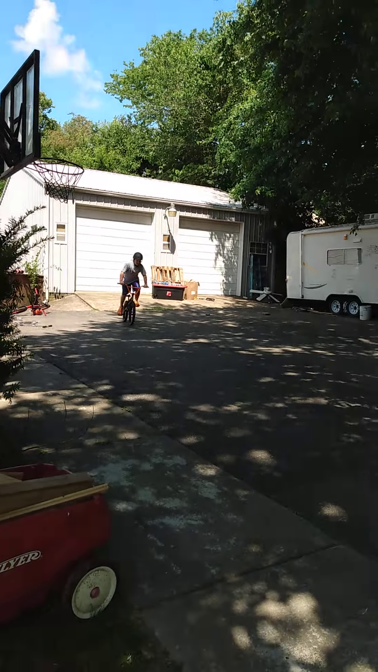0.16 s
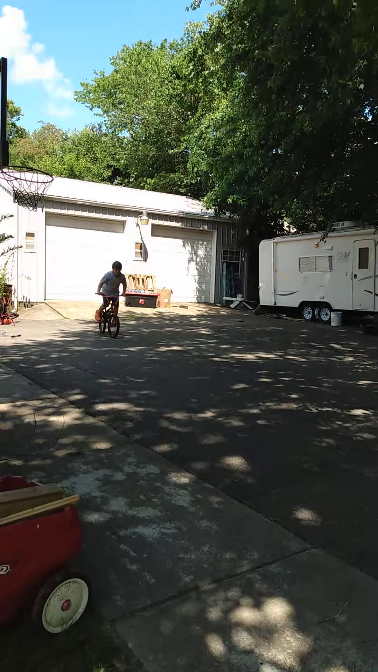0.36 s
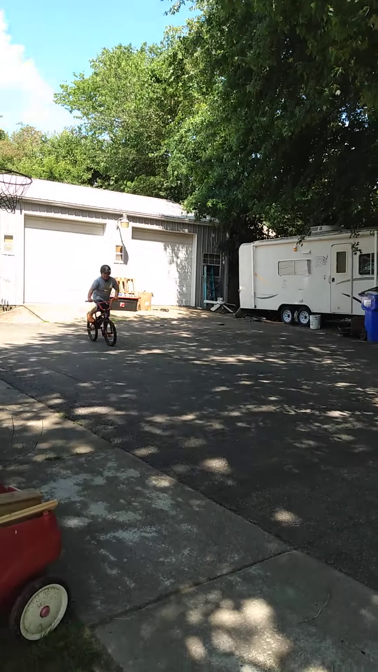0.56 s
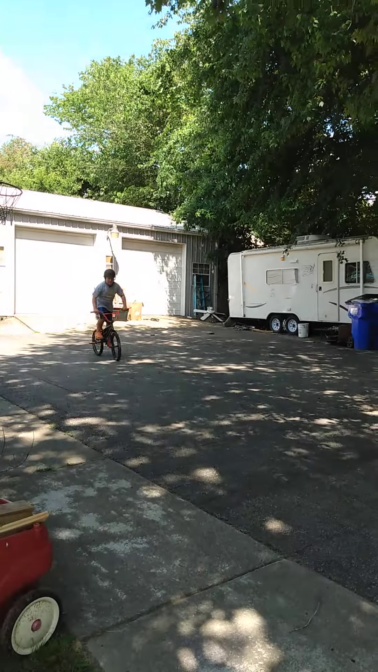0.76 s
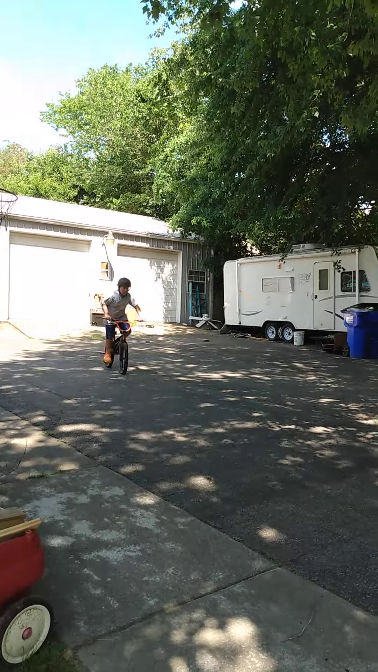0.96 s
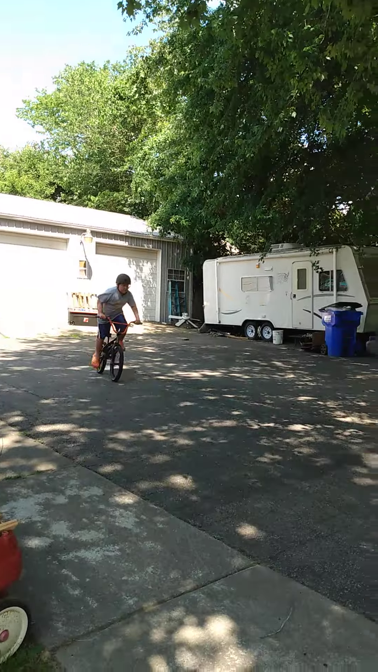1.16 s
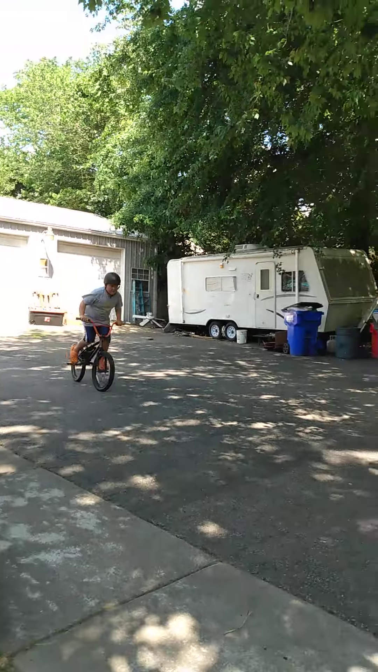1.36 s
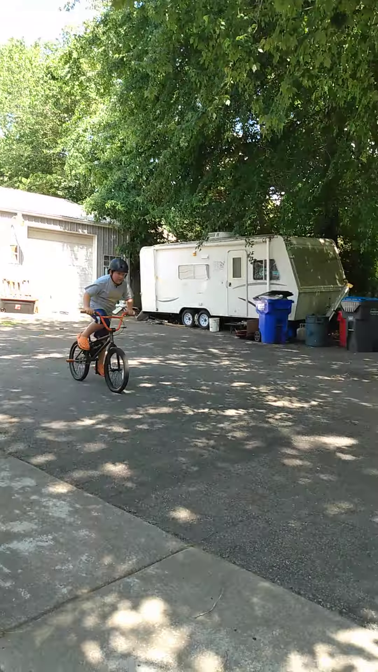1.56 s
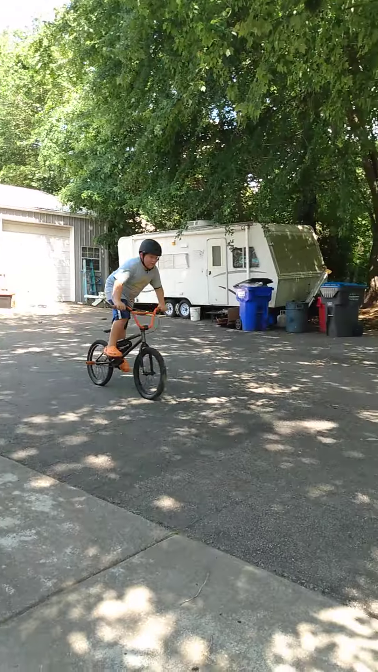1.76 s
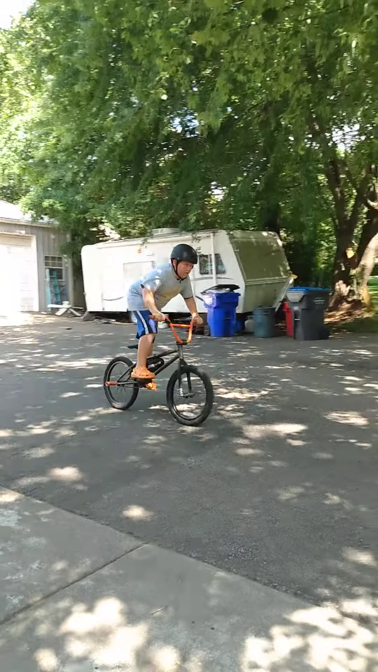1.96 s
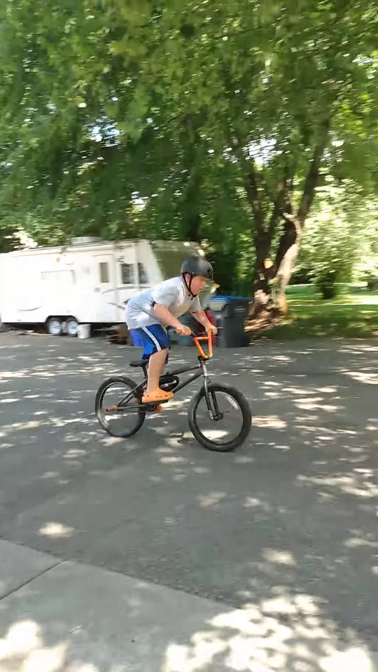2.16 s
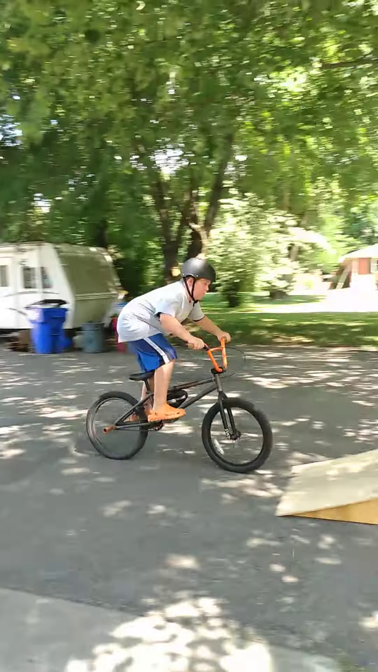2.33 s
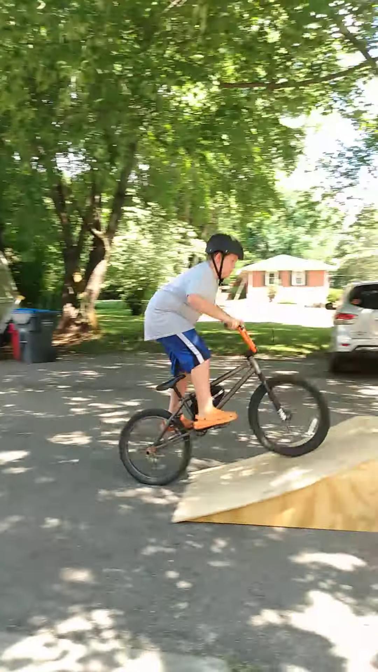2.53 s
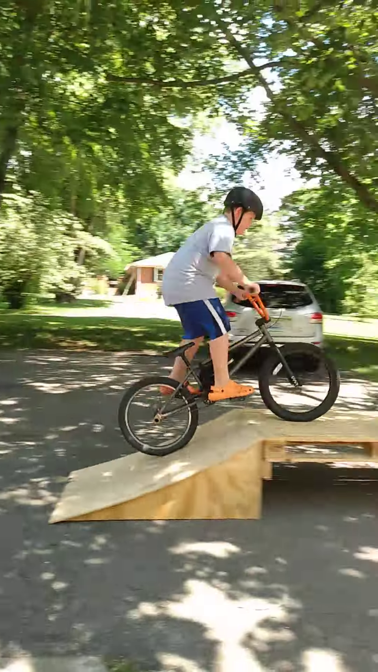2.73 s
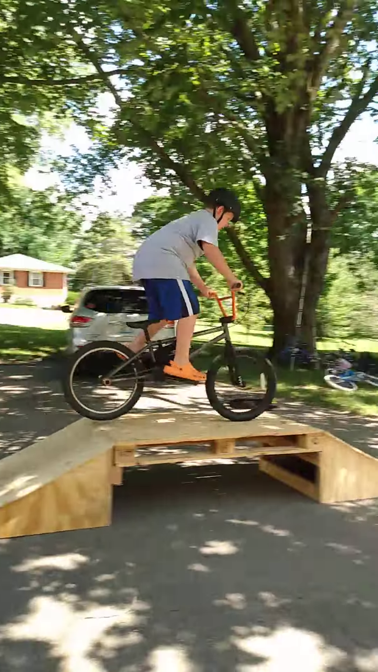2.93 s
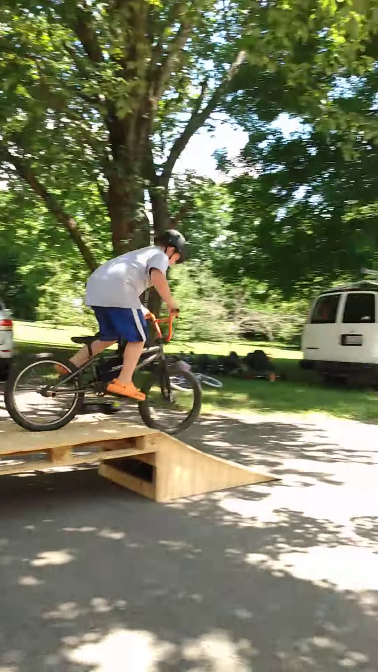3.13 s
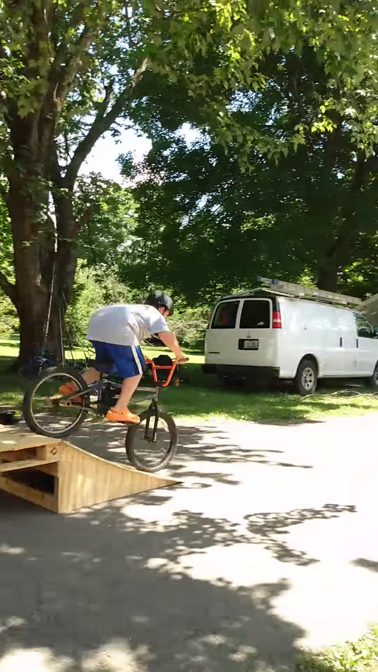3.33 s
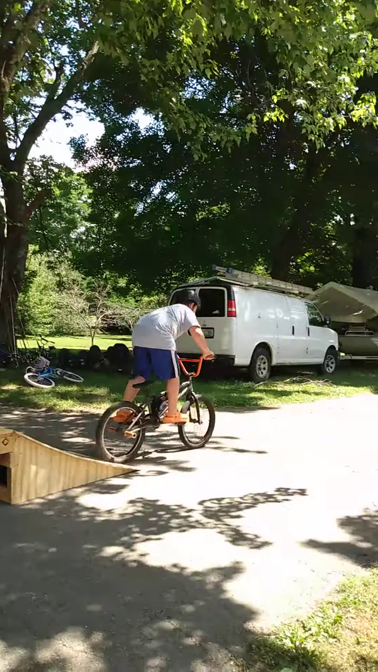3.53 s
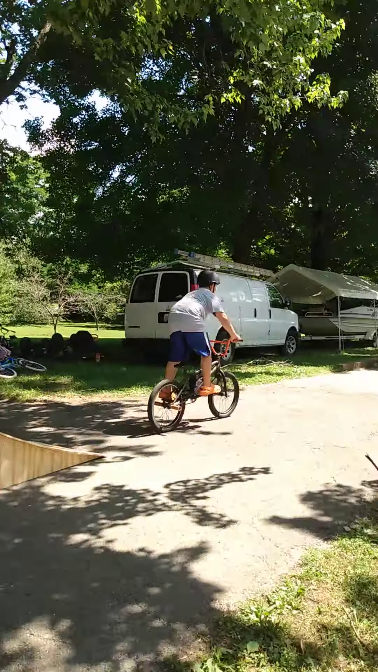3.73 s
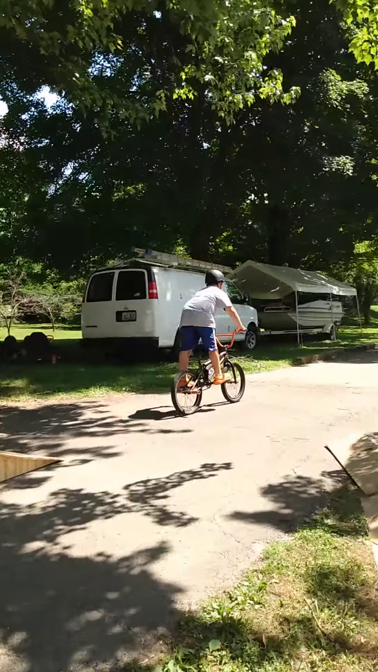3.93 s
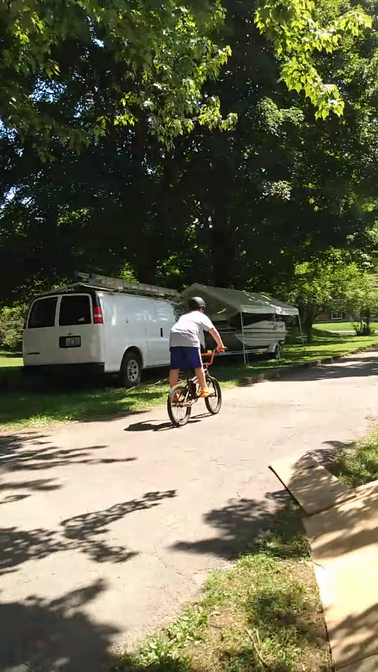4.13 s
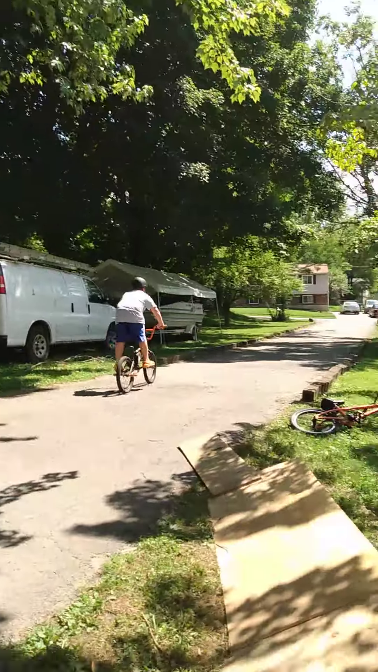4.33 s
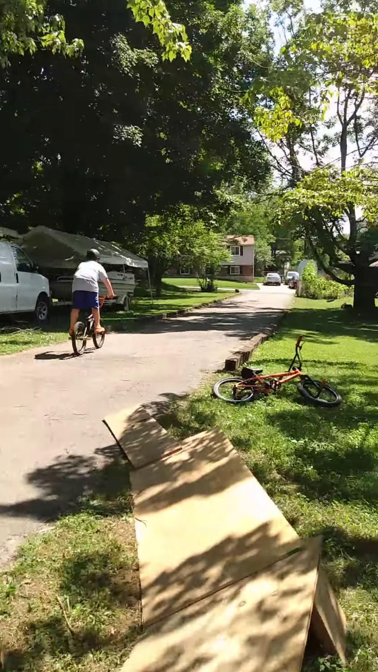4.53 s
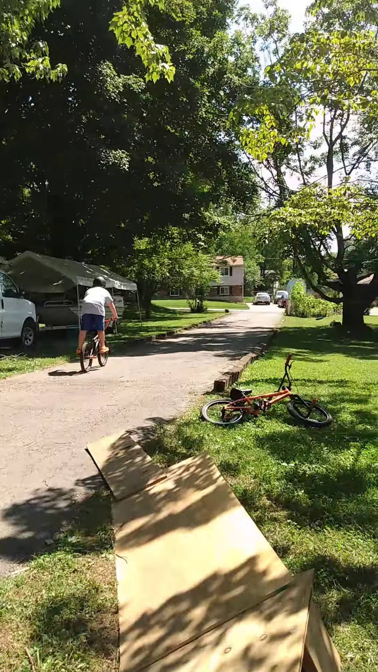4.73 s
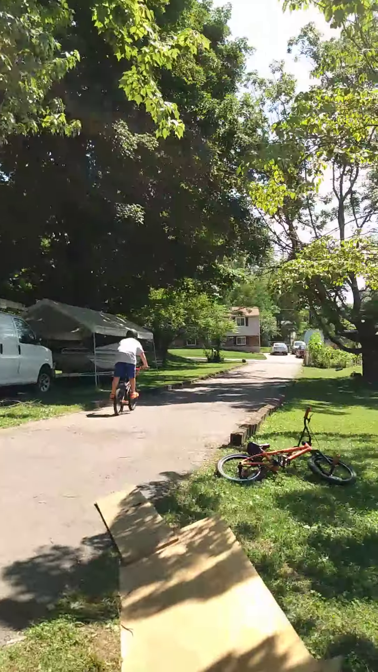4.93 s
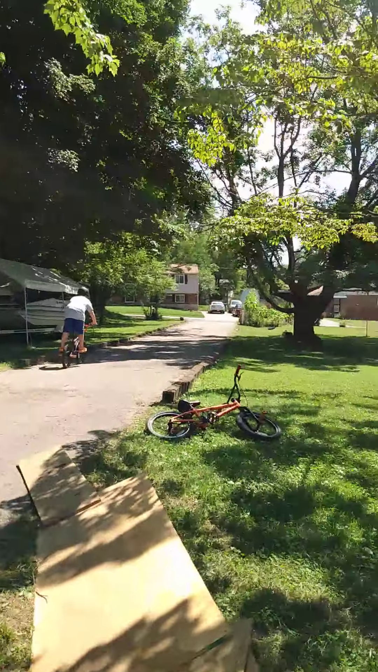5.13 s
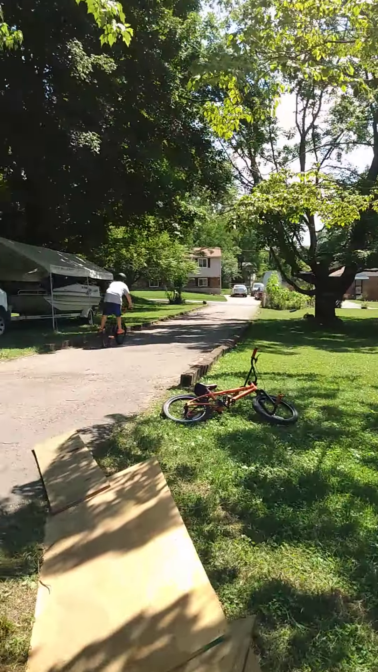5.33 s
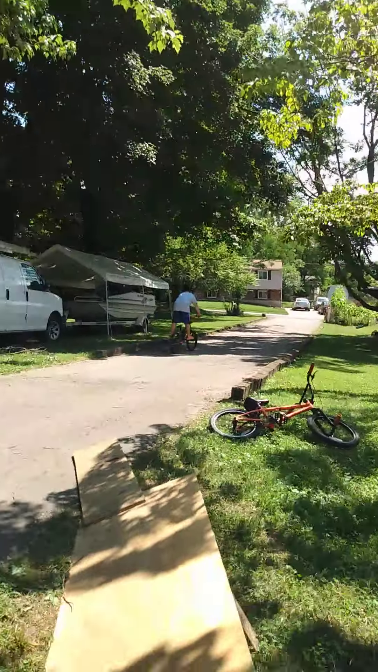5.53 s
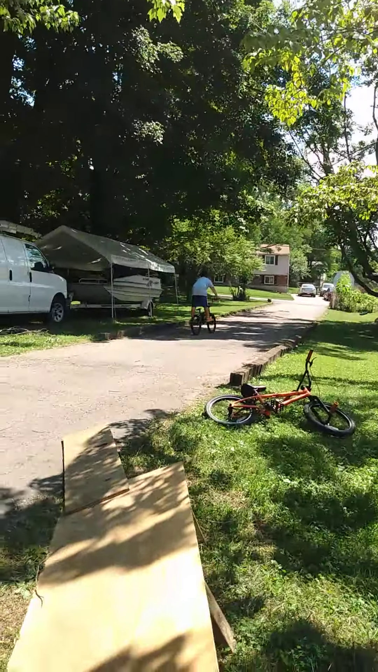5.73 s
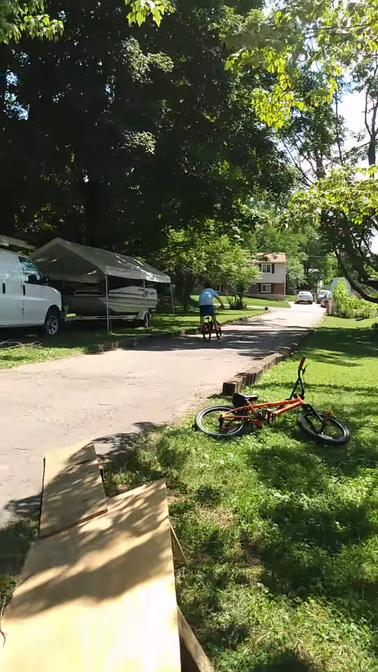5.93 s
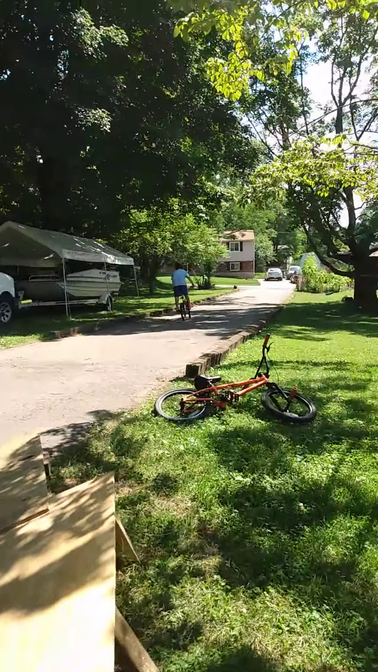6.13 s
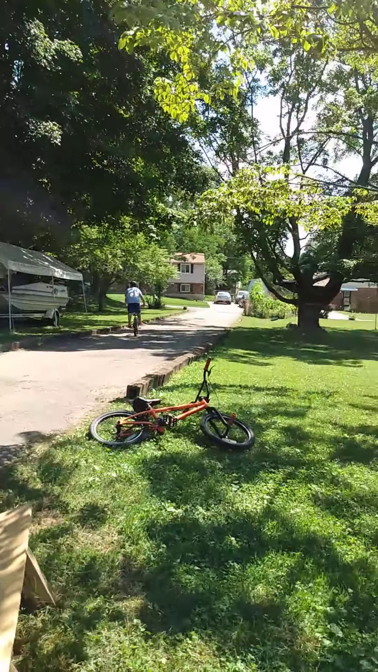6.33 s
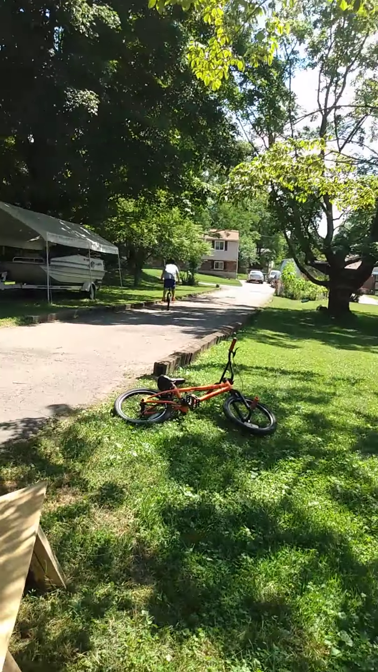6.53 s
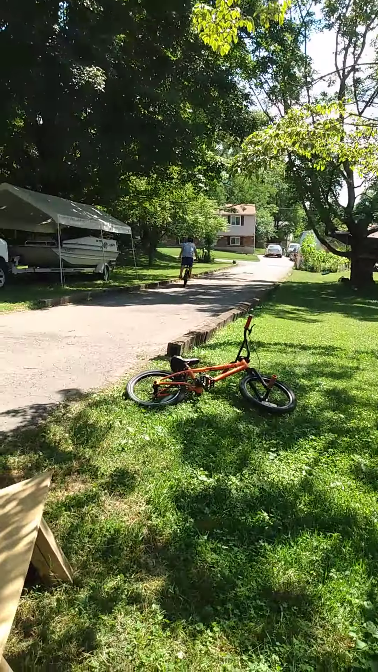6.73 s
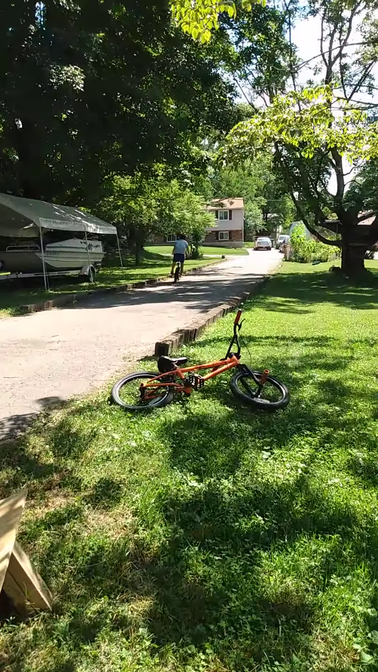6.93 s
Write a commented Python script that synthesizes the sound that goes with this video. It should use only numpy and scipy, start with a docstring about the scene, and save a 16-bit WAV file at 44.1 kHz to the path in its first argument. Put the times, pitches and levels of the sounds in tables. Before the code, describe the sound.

A small bicycle approaches over asphalt against the faint hiss of a quiet street. For the first 1.7 seconds there are soft, hissing pedal strokes and a few small chain clicks. At about 1.8 seconds it starts coasting: the freewheel ticks, quickly speeding into a fast run, and the tyre noise grows as it comes close. At about 2.5 and 2.7 seconds the wheels hit a hollow plywood ramp with two heavy thumps, the loudest sounds, each with a crack and a short clatter. The boards drum briefly, a duller thud comes at 3.3 seconds, and lighter knocks follow until 3.7. The ticking and tyre noise then recede, the ticking continuing faintly to the end at about 7 seconds. From 4.6 seconds, shoes shuffle softly in grass near the microphone with a few tiny snaps. Faint low wind puffs touch the microphone now and then.

```python
"""On an asphalt drive, a small bicycle is pedalled closer, coasts over a hollow plywood ramp, lands and
rolls away down the street. The pedal strokes hiss, the tyres roar, and the wheels thump the wooden panels.
While it coasts, small catches (pawls) in the freewheel snap off a ring of teeth and tick. Someone shuffles
in the grass nearby, and light wind puffs on the left and right microphone openings."""
import sys
import numpy as np
from scipy import signal
from scipy.fft import rfft, irfft
from scipy.io import wavfile
from scipy.ndimage import uniform_filter1d

SR = 44100
rng = np.random.default_rng(int(sys.argv[2]) if len(sys.argv) > 2 else 0)


def inscribe(sig):
    """Save sig as 16-bit PCM at rate SR to the path in sys.argv[1].

    A 1-D sig is mono; a 2-D sig holds one channel per row.
    Samples are clipped to [-1, 1] before scaling.
    """
    pcm = np.round(np.clip(np.atleast_2d(sig).T, -1, 1) * 32767)
    wavfile.write(sys.argv[1], SR, pcm.astype(np.int16))


N = 307818
TIME = np.arange(N) / SR

# Tone colours of the noises, from bass to treble: f/Hz, relative level/dB
AIR_COLOUR = [(12, -27), (20, 1), (77, -7), (300, -12.5), (1080, -16.5), (2180, -29.5), (2890, -10.5),
              (3520, -13.5), (3940, -11), (6350, -30), (6910, -11.5), (12800, -9), (15200, -3.5),
              (16500, -39.5)]
WIND_COLOUR = [(12, -50), (20, -34), (76, 0), (123, -19), (169, -16), (239, -52), (350, -84), (460, -71),
               (770, -120)]
GRASS_COLOUR = [(410, -67), (700, -50), (949, 1.5), (1570, 3.5), (2590, 4), (2840, -3.5), (4400, 1.5),
                (5960, -4.5), (10800, 2), (15400, -13), (16500, -8)]
TREAD_COLOUR = [(440, -47), (750, -39), (945, -15.5), (1370, -12.5), (1860, -7), (2800, -23), (3020, -12.5),
                (4000, -6), (5200, -56.5), (8800, -120)]
TYRE_WALL_COLOUR = [(88, -51.5), (150, -16.5), (301, 4.5), (502, 3), (600, 7), (775, -28.5), (900, -35),
                    (1170, -50.5), (1980, -120)]
PEDAL_HIGH_COLOUR = [(2650, -18), (4500, -10), (5440, -6), (6000, 1), (11100, 4), (15100, 3.5),
                     (16200, -40), (16500, -56)]
PEDAL_LOW_COLOUR = [(530, -71), (900, -39), (1320, -30), (1680, -16), (2050, -29.5), (2780, -16.5),
                    (3890, -26), (5000, -32.5), (6500, -79), (11000, -120)]
PAWL_COLOUR = [(700, -70), (1250, -44), (1500, -13), (2000, -9.5), (3010, -6.5), (4130, -8.5), (6900, -11),
               (9290, -2), (11300, -1.5), (15600, -7.5), (16500, -27)]

# Sounds that swell and fade: start t/s, length/s, level/dB
WIND_PUFFS = [(1.43, .05, -64), (1.496, 0.074, -59.5), (1.569, 0.061, -49.5), (1.647, 0.078, -56.5),
              (1.81, 0.095, -67), (1.93, 0.053, -57), (2.01, 0.053, -67), (2.128, 0.063, -56),
              (4.646, .06, -66), (4.726, 0.21, -70), (4.972, 0.085, -59), (5.561, 0.083, -63),
              (5.936, 0.061, -53.5), (6.032, 0.075, -47), (6.1, 0.14, -65), (6.34, 0.1, -64),
              (6.477, 0.11, -62), (6.73, 0.12, -58.5)]
FOOT_SHUFFLES = [(4.6, 0.37, -58.5), (4.85, 0.29, -51), (5.26, 0.17, -49.5), (5.43, 0.29, -53),
                 (5.815, 0.18, -46.5), (5.96, 0.87, -52.5), (6.24, 0.17, -43), (6.65, 0.27, -55),
                 (6.85, 0.22, -47)]
COARSE_ASPHALT = [(1.56, 0.48, -68.5), (2.13, 0.093, -79), (4.4, 0.25, -77), (5.22, 0.16, -71)]
PEDAL_STROKES = [(0.0, 0.29, -60), (.44, 0.4, -53), (.866, 0.63, -51), (1.39, 0.6, -55),
                 (1.51, 0.24, -44.5)]

# Modes, the pitches at which a thing rings: f/Hz, width/Hz, relative level/dB
WHINE_MODE = [(3845, 73, 0)]
HUB_SHELL_MODES = [(2985, 80, -2), (3080, 60, 0), (3250, 90, -3)]
SPOKE_MODES = [(1600, 1300, 3), (4790, 67, 2.5), (7514, 74, 6.5), (8390, 290, -4.5), (9190, 120, 3.5),
               (9900, 200, -16.5), (10640, 240, 5.5), (11660, 240, 6), (12700, 600, -0.5),
               (14000, 180, -14)]
RAMP_LIP_MODES = [(1039, 130, 6), (1638, 180, 7), (3270, 380, -26), (6200, 1200, -17.5)]
LOOSE_SHEET_MODES = [(323, 110, 16), (573.5, 160, -9), (1000, 310, -11), (1860, 760, -22.5)]
PLYWOOD_MODES = [(97, -13, .3), (145, -3, .22), (154, -3, .22), (300, -3, .08), (348, -6, .1),
                 (231, -12, .2), (400, -12, .15), (490, -16, .15), (550, -18, .15), (592, -16, .15),
                 (727, -24, .1), (1010, -24, .05)]  # the hollow ramp: base f/Hz, relative level/dB, time to fade 60 dB/s

SMALL_SNAPS = [(0.467, -50.5, 1000, 16), (.476, -62, 1300, 8.6), (0.498, -53, 1220, 13),
               (4.861, -48, 2550, 5.1), (4.975, -56, 600, 5.8), (5.571, -47, 794, 4.8),
               (5.585, -45.5, 564, 11), (6.267, -51.5, 2610, 3.4), (6.38, -40, 2430, 2.8),
               (6.851, -52.5, 1450, 5.9)]  # snaps and knocks nearby: t/s, peak level/dB, f/Hz, fade time/ms
BICYCLE_PATH = [(1.45, 33), (1.8, 10.5), (2.15, 5.43), (2.6, 3.7), (3.0, 3.82), (3.67, 3.5), (3.9, 4.44),
                (4.85, 7.2), (5.0, 9.4), (5.9, 12.7), (6.98, 21.5)]  # how far away the bicycle is: t/s, distance/m
CHAIN_TICKS = [(0.395, -51.5), (0.587, -68), (0.62, -63), (0.657, -51.5), (0.8684, -56), (1.158, -47.5),
               (1.3954, -55), (1.436, -53), (1.51, -46), (1.5486, -45), (1.6492, -48)]  # clicks of the chain: t/s, level/dB
WHINE_LEVEL = [(0.75, -101), (0.864, -70), (1.55, -72)]  # a thin whine as the bicycle nears: t/s, level/dB
TEETH_PASSED = [(1.781, 0), (1.875, 2), (1.903, 3), (2.023, 10), (2.092, 15), (2.289, 31), (2.539, 51),
                (2.721, 63), (2.767, 65), (2.887, 71), (3.174, 83), (3.239, 85), (3.281, 87), (3.375, 94),
                (3.491, 100), (3.578, 107), (3.725, 123), (3.775, 128), (3.901, 137), (4.098, 150),
                (4.479, 178), (4.822, 202), (5.485, 251), (5.768, 272), (6.205, 306), (6.965, 362)]  # freewheel teeth passed since the pedals stopped: t/s, count
HUB_RING = [(1.77, -14.5, -4), (2.15, -7.5, -7.5), (2.55, -21.5, -3.5), (2.8, -16, -2), (3.12, -8.5, -3.5),
            (3.5, -10.5, -5), (3.8, -9, -2.5), (4.3, -15, -1.5), (4.9, -18, -2.5), (6.2, -19, -3),
            (6.98, -9.5, -1)]  # the wheel hub: t/s, shell level against the ticks/dB, left minus right/dB
PANEL_DRUMMING = [(2.55, -24), (2.7, -36.5), (2.86, -35), (2.94, -45.5), (3.08, -62), (3.25, -69.5),
                  (3.36, -39), (3.45, -48), (3.76, -46.5), (3.97, -66)]  # wheels rolling on the panels: t/s, level/dB
# Wheels hit the ramp: t/s, thump level/dB, contact time/ms, crack level/dB, clatter level/dB, pitch factor
WHEEL_BLOWS = [(2.527, -31, 0.71, -23, -23.5, 1.13), (2.544, -7, 1.02, -12, -32, 0.95),
               (2.589, -24, 0.75, -44, -30.5, 0.81), (2.702, -25.5, 0.65, -21.5, -26, 2.5),
               (2.718, -7.5, 0.95, -14, -26, 1), (2.764, -23, 1.6, -46, -32.5, 0.96),
               (2.868, -19, 7.1, -66, -73, 0.9), (3.263, -44, 0.67, -41, -51, 0.88),
               (3.278, -20.5, 3.7, -34, -39, 0.6), (3.295, -14.5, 3.66, -36, -28, 0.71),
               (3.406, -34, 1.94, -52, -48, 0.96), (3.476, -35, 3.8, -64, -61, 0.73),
               (3.521, -33, 1.6, -54, -39, 0.6), (3.587, -36.5, 2, -62, -55, 0.72),
               (3.696, -26.5, 8.5, -34, -38, 0.86)]

SIDE_LIKENESS = [(100, 0.54), (300, 0.86), (700, 0.92), (1200, 0.096), (2000, 0.057), (3500, 0.91),
                 (7000, 0.075)]  # how alike left and right are: f/Hz, likeness (1 = the same)
SIDE_BALANCE = [(60, 0), (200, -.5), (400, -2), (700, -3.5), (1200, -5), (2400, -3.5), (8000, -2.5)]  # the right microphone is more open: f/Hz, left minus right/dB
RIGHT_LEAD = [(200, 0), (600, 0.61), (1100, 3), (1450, -1.5), (1900, 0.2), (3000, 1.32)]  # how far the wave on the right runs ahead: f/Hz, phase/rad


def gain_of(db):
    """Turns decibels into a number to multiply by."""
    return 10 ** (np.asarray(db) / 20)


def unit_level(x):
    """Scales a sound to an average strength (rms) of 1."""
    return x / np.sqrt(np.mean(x ** 2) + 1e-20)


def look_up(table, hz):
    """Reads a table between its rows, on a scale of octaves."""
    f, value = np.transpose(table)
    return np.interp(np.log(hz + 1), np.log(f + 1), value)


def curves(table):
    """Gives a gate (0 outside the table's time span), then each column at every sample."""
    s, *columns = np.transpose(table)
    gate = np.clip(np.minimum(TIME - s[0], s[-1] - TIME) / .01, 0, 1)
    return [gate] + [np.interp(TIME, s, column) for column in columns]


def swells(events, rise_s, fade_db):
    """Loudness of a row of events: each rises, then has changed by fade_db at the end of its length."""
    s, length, db = np.transpose(events)[:, :, None]
    age = np.maximum(TIME[::32] - s, 0)
    level = np.minimum(age / rise_s, 1) * gain_of(db + fade_db * (age / length) ** 2)
    return np.interp(TIME, TIME[::32], np.sqrt((level ** 2).sum(0)))


def nearness(falloff, full_level_m=4):
    """The bicycle is louder when near; a bigger falloff makes it fade faster with distance."""
    gate, metres = curves(BICYCLE_PATH)
    return gate * (full_level_m / np.maximum(metres, 1)) ** falloff


def pan(x, pan_db):
    """Shares a sound between left and right; below 0 dB the right is louder."""
    return x * gain_of(np.outer([.5, -.5], pan_db))


def noise(colour, patchy_db, size=512, frames=40):
    """Stereo noise of strength 1 whose narrow bands drift up and down by about patchy_db."""
    hop = size // 4
    hz = np.fft.rfftfreq(size, 1 / SR)
    a, b, c, d, patches = rng.standard_normal((N // hop + 5, len(hz), 5), np.float32).T
    for _ in range(2):  # smooth over pitch, then over time
        patches = uniform_filter1d(patches, size=3, axis=0)
        patches = uniform_filter1d(patches, size=frames, axis=1)
    likeness = np.clip(look_up(SIDE_LIKENESS, hz), -1, 1)[:, None]
    lead = np.exp(1j * look_up(RIGHT_LEAD, hz))[:, None]
    left = a + 1j * b
    right = likeness * left * lead + np.sqrt(1 - likeness ** 2) * (c + 1j * d)
    bands = np.array([left, right]) * gain_of(look_up(colour, hz)[:, None] + patchy_db * unit_level(patches))
    return unit_level(signal.istft(bands, nperseg=size, noverlap=size - hop)[1][:, :N])


def ring(x, modes):
    """Lets a sound ring at each mode; narrow modes ring longer."""
    out = 0
    for hz, width, db in modes:
        decay = np.exp(-np.pi * width / SR)
        pole = decay * np.exp(2j * np.pi * hz / SR)
        out = out + gain_of(db) * 2 * signal.lfilter([1 - decay], [1, -pole], x).real
    return out


def add_tail(x, fade_ms):
    """Gives each pulse a tail that dies away."""
    return signal.lfilter([1], [1, -np.exp(-1000 / fade_ms / SR)], x)


def street_air():
    """The faint, steady hiss of the street."""
    return gain_of(-63.5) * noise(AIR_COLOUR, patchy_db=4, size=1024)


def wind(breeze_db=-78.5):
    """Air hits the microphones in low puffs over a steady breeze."""
    level = swells(WIND_PUFFS, rise_s=.0056, fade_db=-13) + gain_of(breeze_db)
    return pan(level * noise(WIND_COLOUR, patchy_db=1.5, size=2048, frames=8), -1.5)


def grass():
    """Dry blades rustle under the shoes."""
    level = swells(FOOT_SHUFFLES, rise_s=.016, fade_db=-14)
    return pan(level * noise(GRASS_COLOUR, patchy_db=2.5, frames=20), -6.5)


def snaps():
    """Short dull ticks, each a burst of noise in a wide band around one pitch."""
    out, t = np.zeros(N), np.arange(2048) / SR
    for s, db, hz, fade_ms in SMALL_SNAPS:
        burst = rng.standard_normal(len(t)) * np.exp(-1000 * t / fade_ms)
        band = [(hz, hz, 0)]
        tick = ring(ring(burst, band), band)
        out[round(s * SR):][:len(t)] += gain_of(db) * tick / abs(tick).max()
    return pan(out, -11)


def tyres(on_ramp_s=2.75, land_s=3.5, fade_db_per_s=72.5):
    """The tread roars and the tyre walls drum on asphalt; both die away on the smooth ramp."""
    tread = pan(noise(TREAD_COLOUR, patchy_db=1.5, frames=16), -4)
    walls = pan(noise(TYRE_WALL_COLOUR, patchy_db=6.5, size=2048, frames=8), -2.2)
    leaving = gain_of(-fade_db_per_s * np.maximum(TIME - on_ramp_s, 0)) * (TIME < land_s)
    landing = np.clip((TIME - land_s) / .015, 0, 1)
    tread_level = gain_of(-47.5) * nearness(falloff=2.04)
    wall_level = gain_of(-55) * nearness(falloff=3.5) + swells(COARSE_ASPHALT, rise_s=.045, fade_db=-18)
    return (leaving + landing) * (tread_level * tread + wall_level * walls)


def pedalling(rise_s=.0066):
    """Each push of the pedals hisses, with small ticks from the chain and a thin whine."""
    s, tick_db = np.transpose(CHAIN_TICKS)
    ticks = np.zeros(N)
    ticks[(s * SR).astype(int)] = gain_of(tick_db)
    high_level = swells(PEDAL_STROKES, rise_s, fade_db=-20) + add_tail(ticks, fade_ms=6.5)
    high = high_level * noise(PEDAL_HIGH_COLOUR, patchy_db=-5)
    low_level = gain_of(-13.5) * swells(PEDAL_STROKES, rise_s, fade_db=-5.5)
    low = low_level * noise(PEDAL_LOW_COLOUR, patchy_db=2.5, size=1024, frames=16)
    gate, whine_db = curves(WHINE_LEVEL)
    whine = unit_level(ring(ring(rng.standard_normal((2, N)), WHINE_MODE), WHINE_MODE))
    return pan(high + low + gate * gain_of(whine_db) * whine, -3.5)


def freewheel(spread_s=.006, rise_ms=.53, fade_ms=2.8, echo_ms=20, echo_db=-2.5, uneven_db=.03):
    """Three pawls drop off each tooth nearly together; hub shell and spokes ring, the street echoes."""
    s, teeth = np.transpose(TEETH_PASSED)
    tooth_s = np.interp(np.arange(teeth[-1] + 1), teeth, s)
    drop_s = tooth_s[:, None] + rng.random((len(tooth_s), 3)) * spread_s - .002
    wobble = rng.standard_normal((len(tooth_s), 4))  # one for the tooth, three for the pawls
    strength = gain_of(uneven_db * (wobble[:, 1:] + wobble[:, :1]))
    drops = np.zeros(N)
    np.add.at(drops, np.minimum((drop_s * SR).astype(int), N - 1), strength)
    energy = abs(uniform_filter1d(drops ** 2, size=round(rise_ms * SR / 1000)))
    direct = add_tail(energy, fade_ms / 2)  # energy fades twice as fast as the wave
    echo = add_tail(energy, echo_ms / 2)
    power = direct / direct.mean() + gain_of(2 * echo_db) * echo / echo.mean()
    snap = unit_level(noise(PAWL_COLOUR, patchy_db=-2, size=256) * np.sqrt(power))
    gate, shell_db, pan_db = curves(HUB_RING)
    spokes = gain_of(-4) * unit_level(ring(snap, SPOKE_MODES))
    shell = gain_of(shell_db) * unit_level(ring(snap, HUB_SHELL_MODES))
    ticks = unit_level(snap + spokes) + shell
    return pan(ticks * gate * gain_of(-40.5) * nearness(falloff=1), pan_db)


def rolling_on_panels():
    """Rolling wheels drum the plywood; the rider's weight lowers its pitch."""
    gate, db = curves(PANEL_DRUMMING)
    loaded = [(hz * .736, 4 / fade_s, mode_db / 2) for hz, mode_db, fade_s in PLYWOOD_MODES]
    drumming = ring(ring(rng.standard_normal(N), loaded), loaded)
    return gate * gain_of(db) * unit_level(drumming)


def panel_thump(t, contact_ms, pitch):
    """A soft tyre sets the plywood ringing; a longer contact sounds duller."""
    ringing = 0
    for hz, db, fade_s in PLYWOOD_MODES:
        build_up = 1 - np.exp(-2 * hz * t)  # takes about half a vibration
        ringing += gain_of(db - 60 * t / fade_s) * build_up * np.cos(2 * np.pi * hz * pitch * t)
    push = np.hanning(round(contact_ms * SR / 1000))
    return np.convolve(ringing, push / push.sum())[:len(t)]


def ramp(crack_ms=1.5, clatter_ms=24.1):
    """Wheels thump and roll over the hollow ramp; its lip cracks on the asphalt, loose sheets clatter."""
    t, blows = np.arange(SR // 3) / SR, np.zeros(N)
    for s, thump_db, contact_ms, crack_db, clatter_db, pitch in WHEEL_BLOWS:
        grit, rattle = rng.standard_normal((2, len(t)))
        thump = gain_of(thump_db) * panel_thump(t, contact_ms, pitch)
        crack = ring(grit * np.exp(-1000 * t / crack_ms), RAMP_LIP_MODES)
        crack *= gain_of(crack_db) / abs(crack).max()
        clatter = gain_of(clatter_db) * unit_level(ring(rattle, LOOSE_SHEET_MODES))
        clatter *= np.minimum(t / .002, 1) * np.exp(-1000 * t / clatter_ms)
        blows[round(s * SR):][:len(t)] += thump + crack + clatter
    hz = np.fft.rfftfreq(N, 1 / SR)
    spectrum = pan(rfft(blows + rolling_on_panels()), look_up(SIDE_BALANCE, hz))
    lead = np.exp(1j * np.outer([-.5, .5], look_up(RIGHT_LEAD, hz)))
    return irfft(spectrum * lead, N)


def scene():
    """The bicycle, the feet and the wind over the faint air of the street."""
    return street_air() + freewheel() + pedalling() + tyres() + ramp() + grass() + snaps() + wind()


def reduce_noise(x, margin_db=7, depth_db=10):
    """Turns down each narrow band of pitch while it is near its own quiet level."""
    bands = signal.stft(x, nperseg=1024, noverlap=768)[2]
    power = uniform_filter1d(abs(bands) ** 2, size=3, axis=1)
    power = uniform_filter1d(power, size=10, axis=2)
    level_db = 10 * np.log10(abs(power) + 1e-20)
    quiet_db = np.percentile(level_db, 12, axis=2, keepdims=True)
    shut = np.clip(.5 - (level_db - quiet_db) / margin_db, 0, 1)
    return signal.istft(bands * gain_of(-depth_db * shut), nperseg=1024, noverlap=768)[1][:, :N]


def record(dry):
    """Cuts the deepest bass, turns down steady noise, then cuts the highest treble."""
    bass_cut = signal.butter(3, 58, "high", fs=SR, output="sos")
    treble_cut = signal.firwin(511, 15850, window=("kaiser", 9), fs=SR)
    cleaned = reduce_noise(signal.sosfilt(bass_cut, dry))
    return signal.oaconvolve(cleaned, treble_cut[None], "same")


dry = scene()
out = record(dry)
inscribe(out)
```